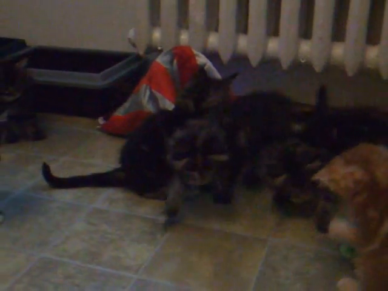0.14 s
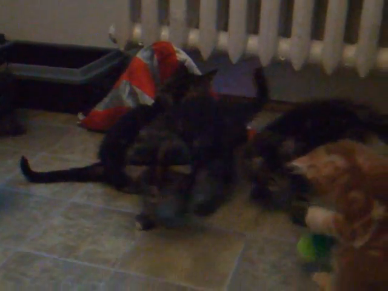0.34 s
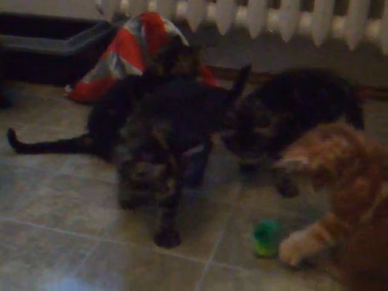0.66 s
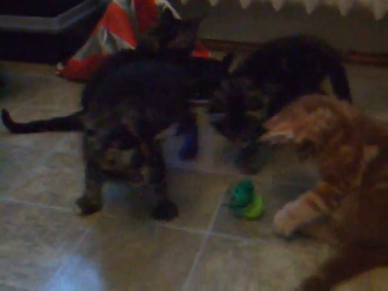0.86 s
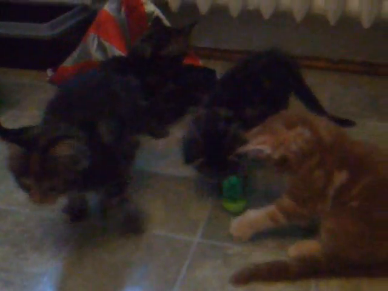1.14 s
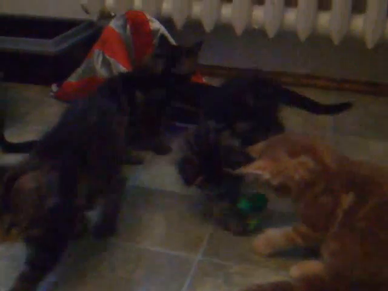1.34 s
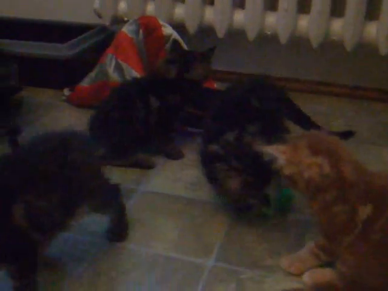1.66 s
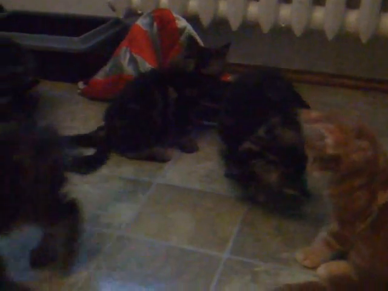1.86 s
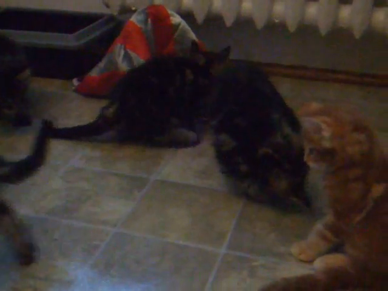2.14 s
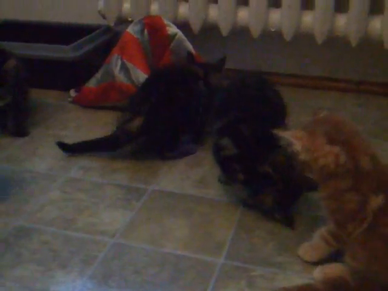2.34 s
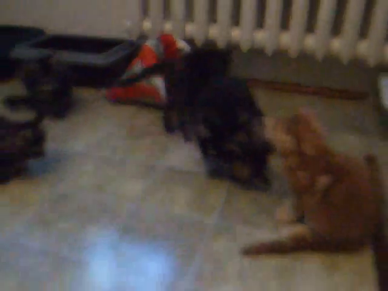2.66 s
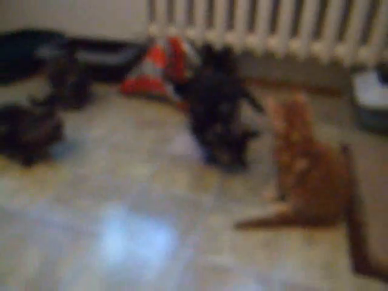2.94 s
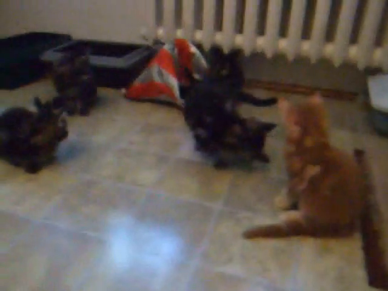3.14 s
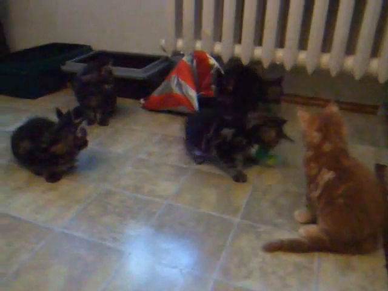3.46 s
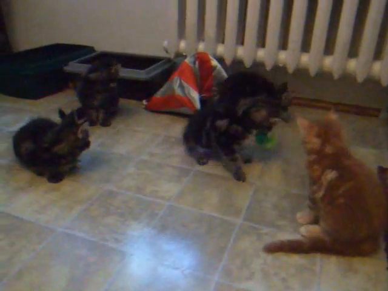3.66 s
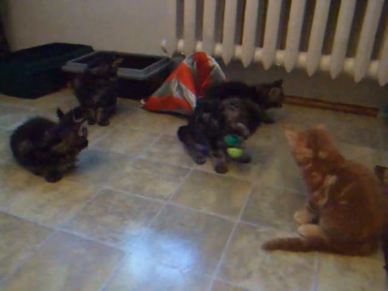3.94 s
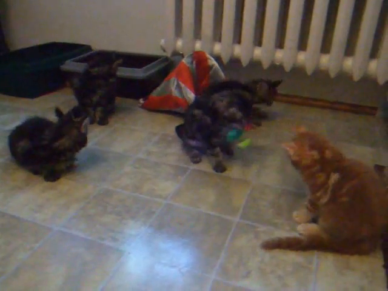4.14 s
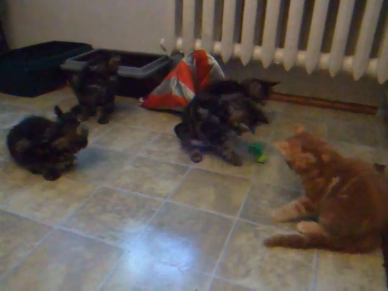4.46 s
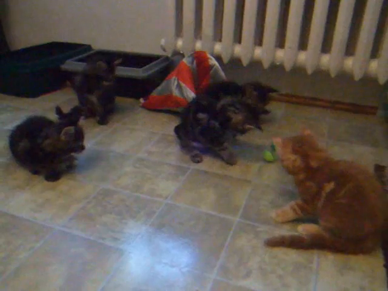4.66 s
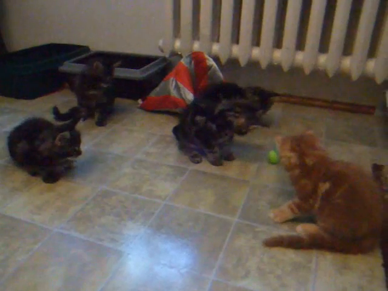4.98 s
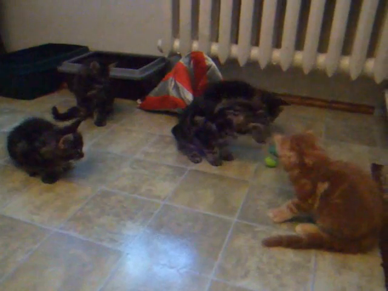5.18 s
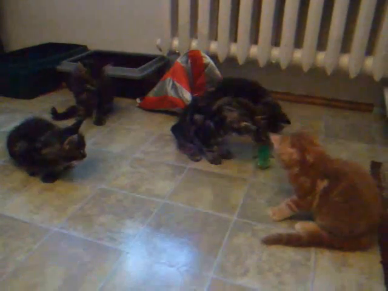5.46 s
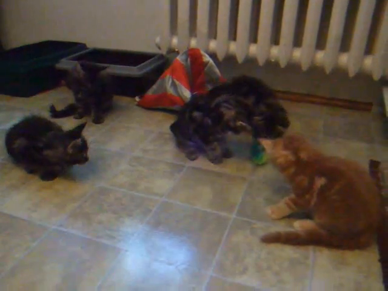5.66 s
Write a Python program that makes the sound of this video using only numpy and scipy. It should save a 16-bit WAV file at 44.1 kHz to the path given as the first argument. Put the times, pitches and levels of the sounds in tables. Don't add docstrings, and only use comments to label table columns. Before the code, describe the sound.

In a hard, live indoor room with a tile floor, kittens bat a plastic toy, but the camera's own mechanism dominates. Rhythmic focus clicks, one heavy overloaded knock, faint padding and shuffling, then a brief motor squeak and gear rasp. Steady clicking resumes, with a sharper knock later, and finally only hiss, faint whir and a thin whine. Low-grade mono sound, grainy, with dull detail and false treble.

```python
import sys
import numpy as np
from scipy import signal
from scipy.io import wavfile
from scipy.ndimage import uniform_filter1d

SR = 44100
rng = np.random.default_rng(int(sys.argv[2]) if len(sys.argv) > 2 else 0)


def convert_level_to_amplitude(level_db):
    exponent = np.asarray(level_db, float) / 20
    return 10 ** exponent


def put_to_file(sound):
    columns = np.atleast_2d(sound).T
    safe = np.clip(columns, -1, 1)
    whole_steps = np.round(safe * 32767)
    wavfile.write(sys.argv[1], SR, whole_steps.astype(np.int16))


N = 256220

STEPS_PER_S = 293
FRAME_S = 1 / 30
RING_SPREAD, TICK_SPREAD = .03, .3
FOCUS_RUNS = { "hunt out": [(.0042, .404, -22, 2080)], "hunt back": [(.0727, .0727, -30.5, 1450),
              (.2039, .3371, -30, 1960), (.4703, .4703, -31, 1480), (.8041, .8041, -31, 1700),
              (1.27, 1.27, -29.5, 1930)], "creep": [(.836, .836, -28, 1590), (.8694, .9023, -25.5, 1750),
              (.936, 1.2027, -23.5, 1731), (1.3359, 1.3359, -21.5, 1720)],
              "nudge": [(.7028, .7028, -31, 1650), (.7357, .7357, -27, 1690),
              (3.1751, 3.1751, -19.5, 1750)], "stride out": [(3.4374, 3.4374, -20.5, 1643),
              (3.5036, 3.903, -20, 1820), (4.4368, 4.4368, -18.5, 1790)],
              "stride back": [(3.3003, 3.3003, -21, 1500), (3.3752, 3.3752, -24, 1716),
              (3.5704, 3.9705, -23.5, 1700), (4.6024, 4.6024, -24.5, 1690)],
              "restart": [(4.1698, 4.1698, -25.5, 1710), (4.6707, 4.6707, -25.5, 1870),
              (4.9031, 4.9031, -24.5, 1664)], "trot": [(4.0026, 4.1033, -22.5, 1680),
              (4.2031, 4.3358, -20.5, 1793), (4.3685, 4.3685, -28.5, 1680), (4.7025, 4.8362, -22, 1760)], }
HABIT_LEVELS_DB = {"hunt out": (-16.5, -1.5, -13), "hunt back": (1, 4, -4), "creep": (-10, -12.5, -9),
                   "nudge": (-26, -23, -7), "stride out": (-16.5, -9, -12), "stride back": (-12.5, -5, -9),
                   "restart": (-14, .5, -8), "trot": (-21, -14, -13)}
HABIT_PACES = {"hunt out": (4, 2), "hunt back": (4, 2), "creep": (1, 2), "nudge": (1, 2),
               "stride out": (4, 4), "stride back": (4, 4), "restart": (4, 4), "trot": (1, 4)}
# start in seconds, level in dB, ring in Hz, boom, tick and later steps in dB rel.
STRAINED_MOVE = (1.3425, -30, 2050, -18, -10, 0)
# start in seconds, level in dB, ring in Hz, boom, tick and later steps in dB rel.
SWEEP_REBOUND = (3.1800, -24, 1650, -8, -14, -8)
# start in seconds, end in seconds, level in dB.
FOCUS_SWEEP = (3.19, 3.288, -35.5)
# frequency in Hz, level in dB.
SWEEP_HUM = (640, -46)

# time in seconds, shaft rate in Hz, level of the twelfth order in dB.
SHAFT = [
    (2.57, 127, -39),
    (2.584, 124.8, -44),
    (2.618, 125.9, -42),
    (2.828, 133, -39),
    (2.928, 133.8, -39.5),
    (2.94, 138, -41),
]
# multiple, level in dB.
STRONG_ORDERS = [(3, -12), (4, -7), (5, -3.5), (6, -8), (7, -9), (11, -9), (12, 2), (15, -12), (19, -12),
                 (24, -9), (27, -2.5), (30, -8), (39, -7), (40, -9.5)]
WEAK_ORDER_DB, WEAK_SPREAD_DB, TOP_ORDER = -21, 3, 40
# start in seconds, end in seconds, housing at start and at end in dB, teeth in dB rel.
GEARS = [
    (2.49, 2.556, -42, -33, 0.3),
    (2.565, 2.62, -31, -43, -9),
    (2.567, 2.929, -45.5, -45.5, 2),
    (2.931, 2.952, -32.5, -39, -2.5),
    (2.95, 3.012, -48, -50, -1.5),
    (3.008, 3.11, -38.5, -35, -0.5),
]
BARREL_DB = -4
# time in seconds, level in dB, ring in Hz, t60 in seconds.
JOLTS = [(2.524, -31, 652, 0.17), (2.5572, -12, 594, 0.012), (2.567, -39, 123.6, 0.33),
         (2.6, -44, 184.7, .39), (2.831, -38, 268, .067), (2.937, -27.5, 632, 0.042),
         (2.938, -36, 140, .094), (2.971, -38.5, 209.2, .14), (3.013, -33, 646, 0.047),
         (3.023, -30.5, 667, 0.037), (3.043, -27, 680, .06), (3.07, -41, 208.6, .15),
         (3.078, -32, 900, .023), (3.084, -41, 132.7, 0.086), (3.099, -25, 636, 0.025)]
JOLT_RISE = .055
# time in seconds, level in dB.
TEETH_SNAPS = [
    (2.533, -26.5),
    (2.557, -16),
    (2.937, -39),
    (3.023, -20.5),
    (3.078, -37),
    (3.099, -30.5),
]

# time in seconds, blow in dB, ring in Hz, t60 in seconds, crack share.
KNOCKS = [
    (.49803, 13, 1400, .0025, .03),
    (4.4559, 5, 2800, .0042, .4),
]
# delay in seconds, level in dB.
KNOCK_ECHOES = [
    [(.0026, -20), (.0112, -25), (.0144, -22)],
    [(.0035, -15), (.0152, -9), (.0295, -19)],
]
# frequency in Hz, level in dB per Hz.
KNOCK_COLOUR = [
    [(120, -45), (250, -10), (450, -0.5), (650, 0), (1000, -5.5), (1500, -6), (2400, -12.5), (3200, -26),
     (5500, -29.5), (7000, -47)],
    [(80, -29), (220, -15), (420, -4), (700, -3.5), (1100, -11), (1800, -7), (2800, -9.5), (3500, -16.5),
     (5500, -25), (7000, -59)],
]
# frequency in Hz, level in dB, t60 in seconds.
KNOCK_MODES = [
    [(624, 0, 0.26), (721, -13, 1.2), (797, -17, 5.0), (974, 0, 0.18), (1249, -8, 0.57), (1593, -14, 0.38),
     (1728, -13, 0.27)],
    [(404, 0, 0.47), (754, -20, 5.0), (818, -1, 0.17), (1400, -12, 0.14), (1674, -2, 0.15),
     (1750, -31, 5.0), (2347, -6, 0.25), (2498, -6, 0.31)],
]
KNOCK_BASS_HZ = [225, 85]
TAIL_DB = [-21.5, -19.5]
MODES_DB = [-21, -22]
BUILD_S, EARLY_SHARE = .02, .5
# frequency in Hz, t60 in seconds.
ROOM_T60 = [(150, 0.61), (400, 0.45), (1040, 0.46), (2760, 0.42)]

# peak in seconds, thud in dB, hollow in dB rel, seconds to fade 10 dB.
PADS = [
    (.765, -44.5, -8, 0.01),
    (.86, -62, 12, .9),
    (1.5, -48, -5, .3),
    (1.625, -37.5, -3, .075),
    (1.752, -44, -6, .012),
    (1.885, -46, -10, .08),
    (1.935, -48, 2, .06),
    (2.0, -53, -2, .15),
    (2.11, -59.5, 6.5, .05),
    (2.955, -41.5, -2.5, 0.06),
]
PAD_RISE = .25
# time in seconds, level in dB, ring in Hz, t60 in seconds.
BUMPS = [
    (.825, -43, 170, .12),
    (3.79, -44, 95, .15),
    (4.456, -36, 80, .1),
    (4.4562, -13, 620, .025),
]

# frequency in Hz, level in dB per Hz.
AIR_COLOUR = [(18, -28), (30, 1), (49, -7), (433, -14.5), (614, -14), (732, -15), (1440, -19.5),
              (2600, -21), (2840, -14.5), (3700, -19), (4030, -15), (5600, -21), (7280, -56.5),
              (12300, -120)]
AIR_DB, WHIR_DB = -46.5, -57.5
# low edge in Hz, high edge in Hz, level in dB.
WHIR_BANDS = [(940, 1100, -1.5), (2670, 3700, -0.5), (4953, 5300, -3.5)]
# centre in seconds, rise in dB, width in seconds.
WHIR_SWELLS = [
    (.9, 2.5, 1.08),
    (2.9, 7.5, .2),
    (3.6, 4, .6),
    (4.5, 5, .25),
    (5.5, 4.5, 0.46),
]
# frequency in Hz, level in dB rms.
WHINE = (3908, -55)

STORED_RATE_HZ, STEP = 11024, 1 / 128


def focus():
    mix = np.zeros(N)
    for habit, runs in FOCUS_RUNS.items():
        boom_db, tick_db, later_db = HABIT_LEVELS_DB[habit]
        frames, steps = HABIT_PACES[habit]
        for first_s, last_s, db, hz in runs:
            moves = round((last_s - first_s) / (frames * FRAME_S)) + 1
            for s in np.linspace(first_s, last_s, moves):
                tune, bite = rng.standard_normal(2)
                ring_hz = hz * (1 + RING_SPREAD * tune)
                later_hz = .93 * ring_hz if steps == 2 else 6 * STEPS_PER_S
                move_tick_db = tick_db * (1 + TICK_SPREAD * bite)
                focus_move(mix, s, db, ring_hz, boom_db, move_tick_db, later_db, steps, later_hz)
    focus_move(mix, *STRAINED_MOVE, count=4, later_hz=2130)
    focus_move(mix, *SWEEP_REBOUND, count=3, later_hz=1900)

    start_s, end_s, db = FOCUS_SWEEP
    for s in np.arange(start_s, end_s, 1 / STEPS_PER_S):
        focus_move(mix, s, db, 1850, -6, -9, 0, count=1, later_hz=0, loose=.75, brake_s=.0004)
    hum_hz, hum_db = SWEEP_HUM
    t = np.arange(0, end_s - start_s, 1 / SR)
    hum = np.sin(2 * np.pi * hum_hz * t) * signal.windows.tukey(len(t), .2)
    add(mix, start_s, convert_level_to_amplitude(hum_db) * hum)
    return mix


def focus_move(mix, s, db, hz, boom_db, tick_db, later_db, count, later_hz, loose=0.13, brake_s=0.00091):
    chance = rng.standard_normal((count, 4))
    for k, (size, tune, boom, side) in enumerate(chance):
        shift = 1 + 0.046 * tune
        modes = .7 * ring(640 * shift, .001, .03)
        modes += .9 * ring(850 * shift, .001, .022)
        modes += .7 * ring(1080 * shift, .001, .016)
        housing = convert_level_to_amplitude(boom_db + 2 * boom) * modes
        teeth = convert_level_to_amplitude(tick_db) * grit()
        if k == 0:
            lens = convert_level_to_amplitude(2 * loose * size) * swing(hz * (1 + .06 * loose * tune), loose * side, brake_s)
            step = lens + teeth + .3 * housing
        else:
            lens = swing(later_hz, .35 * side, 0.0018)
            step = convert_level_to_amplitude(later_db + size) * (lens + 0.89 * teeth) + 0.77 / k * housing
        add(mix, s - .0007 + k / STEPS_PER_S, convert_level_to_amplitude(db) * step)


def swing(hz, phase, brake_s):
    t = np.arange(2600) / SR - .002
    envelope = np.exp(-(t / np.where(t < 0, .0012, brake_s)) ** 2)
    braked = envelope * np.sin(2 * np.pi * hz * t + phase)
    left = 0.16 * ring(hz, 0.0017, 0.027, phase)
    left += .2 * ring(.8 * hz, 0.00088, .02)
    left += .12 * ring(1.4 * hz, 0.0012, .015)
    return braked + left


def grit():
    burst = rng.standard_normal(2600) * abs(ring(0, .0003, .011, np.pi / 2))
    burst = signal.lfilter(*signal.butter(2, [2300, 5600], "band", fs=SR), burst)
    snap = ring(rng.uniform(3000, 3400), 0.00027, .01)
    return burst / abs(burst).max() + .5 * snap


def zoom():
    mix = np.zeros(N)
    shaft_s, shaft_hz, shaft_db = np.transpose(SHAFT)
    t = np.arange(shaft_s[0], shaft_s[-1], 1 / SR)
    turns = np.cumsum(np.interp(t, shaft_s, shaft_hz)) / SR
    for multiple in range(1, TOP_ORDER + 1):
        weak_db = WEAK_ORDER_DB + WEAK_SPREAD_DB * rng.standard_normal()
        order_db = dict(STRONG_ORDERS).get(multiple, weak_db)
        waver_db = 1.5 * wander(len(t), 1500)
        tone = np.sqrt(2) * np.sin(2 * np.pi * (multiple * turns + rng.random()))
        add(mix, shaft_s[0], convert_level_to_amplitude(np.interp(t, shaft_s, shaft_db) + order_db + waver_db) * tone)

    for start_s, end_s, start_db, end_db, teeth_db in GEARS:
        n = round((end_s - start_s) * SR)
        rasp = rng.standard_normal(n) * convert_level_to_amplitude(2.2 * wander(n, 70))
        grind = convert_level_to_amplitude(-4.5) * band(rasp, 400, 900)
        grind += convert_level_to_amplitude(BARREL_DB) * band(rasp, 1500, 1800)
        grind += convert_level_to_amplitude(teeth_db + 2.5) * band(rasp, 2400, 5800)
        envelope = convert_level_to_amplitude(np.linspace(start_db, end_db, n)) * signal.windows.tukey(n, .08)
        add(mix, start_s, grind * envelope)

    for s, db, hz, t60 in JOLTS:
        add(mix, s, convert_level_to_amplitude(db) * ring(hz, JOLT_RISE * t60, t60))
    for s, db in TEETH_SNAPS:
        add(mix, s, convert_level_to_amplitude(db) * grit())
    return mix


def toy():
    mix = np.zeros(N)
    for (s, db, hz, t60, crack), bass_hz, modes, modes_db, tail_db, echoes, colour in zip(
            KNOCKS, KNOCK_BASS_HZ, KNOCK_MODES, MODES_DB, TAIL_DB, KNOCK_ECHOES, KNOCK_COLOUR):
        knock = noise(lambda f, t: read(colour, f) - 60 * t / read(ROOM_T60, f), frames=260)
        t = np.arange(len(knock)) / SR
        knock *= convert_level_to_amplitude(1.4 * wander(len(knock), 90))
        knock *= 1 - np.exp(-t / .002)
        knock *= 1 - (1 - EARLY_SHARE) * np.exp(-(t / BUILD_S) ** 2)
        knock *= convert_level_to_amplitude(tail_db) / np.std(knock[:4400])
        for mode_hz, mode_db, decay_s in modes:
            envelope = convert_level_to_amplitude(modes_db + mode_db - 60 * t / min(decay_s, .6)) * (1 - np.exp(-t / .008))
            knock += envelope * np.sin(2 * np.pi * mode_hz * t)
        blow = convert_level_to_amplitude(db) * (ring(hz, .0001, t60) + crack * grit())
        for delay_s, echo_db in [(0.000064, 0.041)] + echoes:
            add(knock, delay_s, convert_level_to_amplitude(echo_db) * blow)
        add(mix, s, signal.lfilter(*signal.butter(2, bass_hz, "high", fs=SR), knock))
    return mix


def paws():
    t = np.arange(N) / SR
    lumps = rng.standard_normal(N) * convert_level_to_amplitude(1.7 * wander(N, 700))
    thud, hollow = np.zeros((2, N))
    for s, db, hollow_db, fade_s in PADS:
        fades = np.where(t < s, (s - t) / PAD_RISE, t - s) / fade_s
        power = convert_level_to_amplitude(db - 10 * fades) ** 2
        thud += power
        hollow += power * convert_level_to_amplitude(hollow_db) ** 2
    mix = np.sqrt(thud) * band(lumps, 240, 450)
    mix += np.sqrt(hollow) * band(lumps, 570, 700)
    for s, db, hz, t60 in BUMPS:
        add(mix, s, convert_level_to_amplitude(db) * ring(hz, .03 * t60, t60))
    return mix


def air():
    t = np.arange(N) / SR
    hiss = evened(noise(lambda f, t: read(AIR_COLOUR, f) + 0 * t, frames=N // 128 + 5)[:N])
    whir = sum(convert_level_to_amplitude(db) * band(rng.standard_normal(N), lo_hz, hi_hz) for lo_hz, hi_hz, db in WHIR_BANDS)
    swell_db = sum(db * np.exp(-((t - s) / width_s) ** 2) for s, db, width_s in WHIR_SWELLS)
    whine_hz, whine_db = WHINE
    drift = .5 * wander(N, 3000)
    whine = convert_level_to_amplitude(whine_db) * np.sqrt(2) * np.sin(2 * np.pi * whine_hz * t + drift)
    return convert_level_to_amplitude(AIR_DB) * hiss + convert_level_to_amplitude(WHIR_DB + swell_db) * whir + whine


def ring(hz, rise_s, t60, phase=0):
    t = np.arange(2600 if rise_s < .003 else 12000) / SR
    shape = (1 - np.exp(-t / rise_s)) ** 2 * convert_level_to_amplitude(-60 * t / t60)
    return shape / shape.max() * np.sin(2 * np.pi * hz * t + phase)


def noise(field_db, frames):
    hz = np.fft.rfftfreq(512, 1 / SR)[:, None]
    t = np.arange(frames) * 128 / SR
    a, b = rng.standard_normal((frames, 257, 2)).T
    return signal.istft((a + 1j * b) * convert_level_to_amplitude(field_db(hz, t)), nperseg=512, noverlap=384)[1]


def wander(n, samples):
    return evened(uniform_filter1d(rng.standard_normal(n), samples))


def band(x, lo_hz, hi_hz):
    return evened(signal.sosfilt(signal.butter(2, [lo_hz, hi_hz], "band", fs=SR, output="sos"), x))


def evened(x):
    return x / np.sqrt(np.mean(x ** 2) + 1e-20)


def read(points, hz):
    f, value = np.transpose(points)
    return np.interp(np.log(hz + 1), np.log(f + 1), value)


def add(mix, s, sound):
    part = mix[max(round(s * SR), 0):][:len(sound)]
    part += sound[:len(part)]


def scene():
    return (focus() + zoom() + toy() + paws() + air())[None]


def low_pass(x):
    return signal.sosfilt(signal.butter(12, 15640, fs=SR, output="sos"), x)


def record(dry):
    smooth = signal.oaconvolve(dry, signal.firwin(41, 6000, fs=SR)[None], "same")
    stored = np.floor(np.clip(smooth, -1, 1 - STEP) / STEP) * STEP
    slot = np.floor(np.arange(N) * STORED_RATE_HZ / SR)
    held = stored[:, np.ceil(slot * SR / STORED_RATE_HZ).astype(int)]
    return low_pass(held)


dry = scene()
out = record(dry)
put_to_file(out)
```